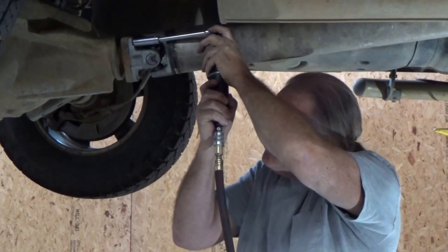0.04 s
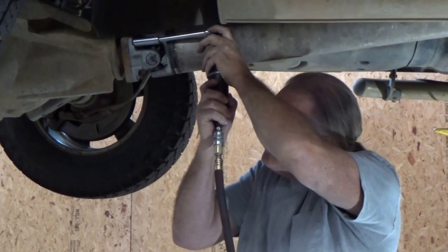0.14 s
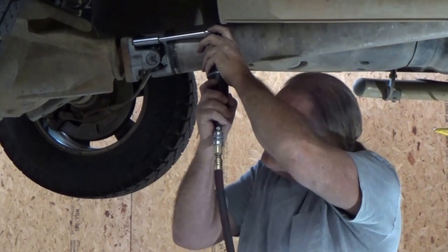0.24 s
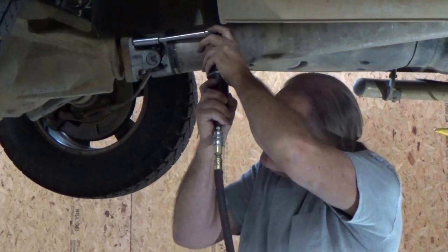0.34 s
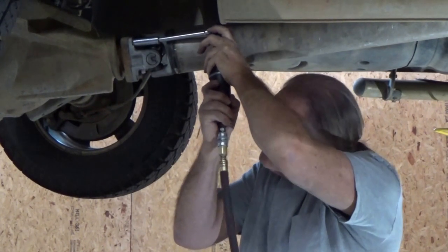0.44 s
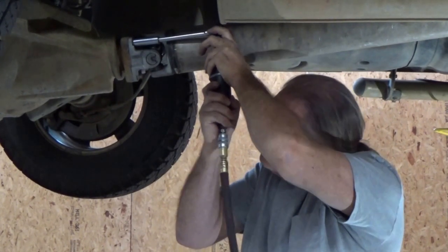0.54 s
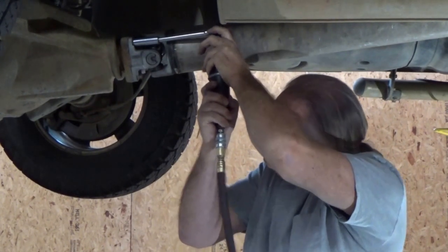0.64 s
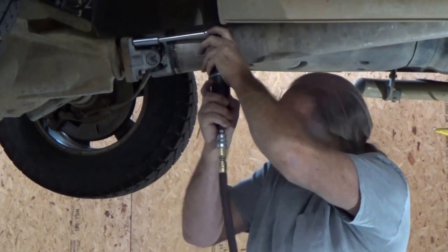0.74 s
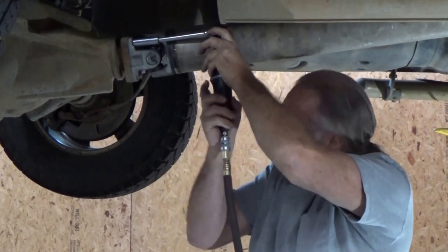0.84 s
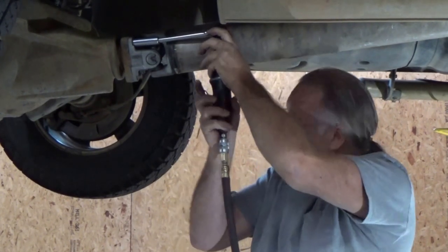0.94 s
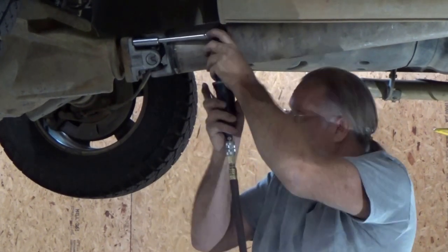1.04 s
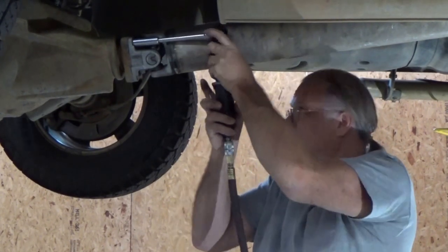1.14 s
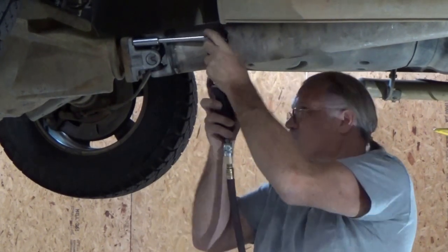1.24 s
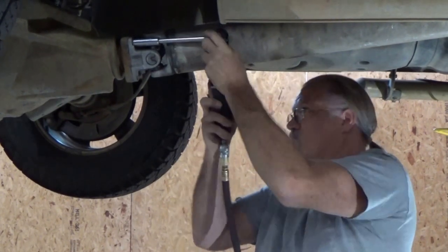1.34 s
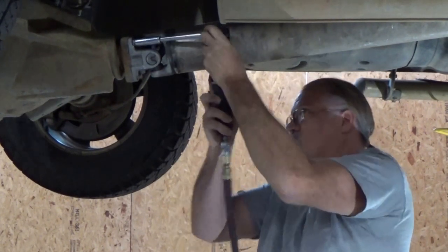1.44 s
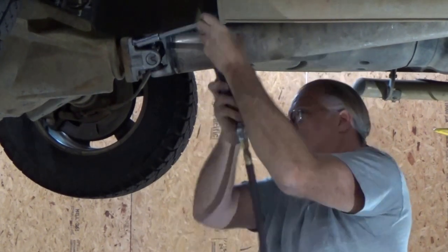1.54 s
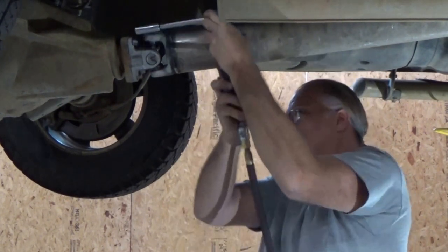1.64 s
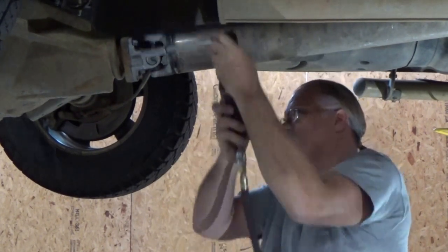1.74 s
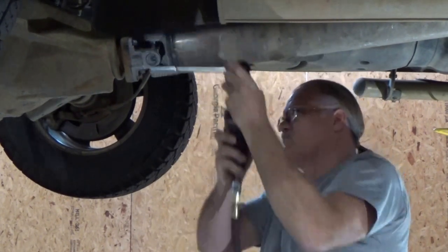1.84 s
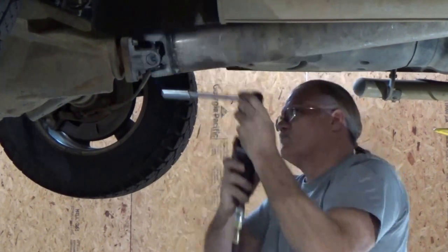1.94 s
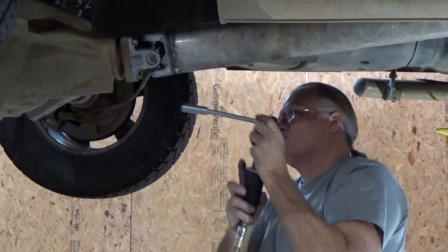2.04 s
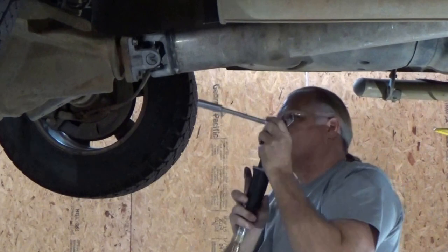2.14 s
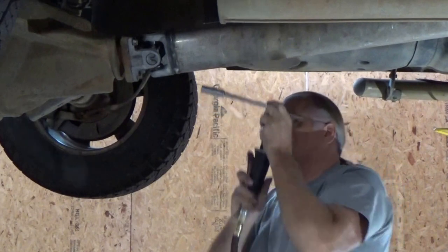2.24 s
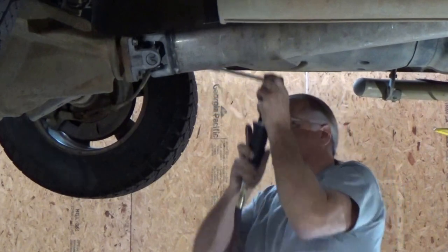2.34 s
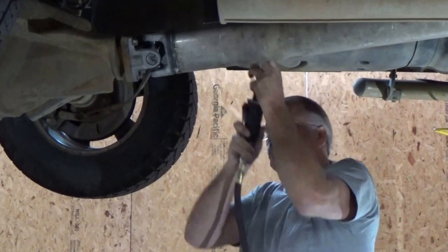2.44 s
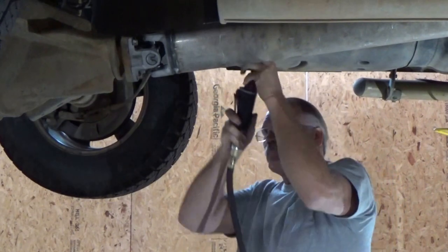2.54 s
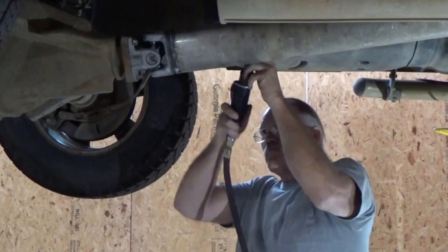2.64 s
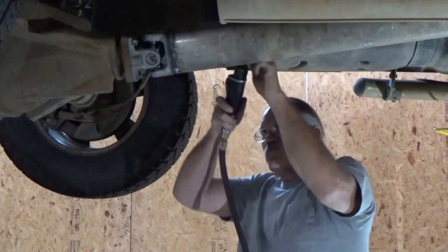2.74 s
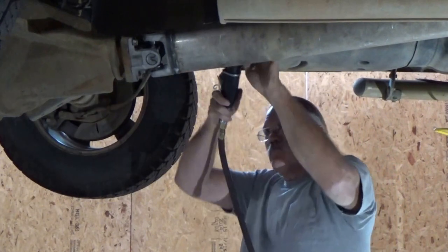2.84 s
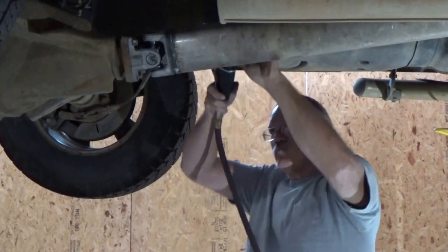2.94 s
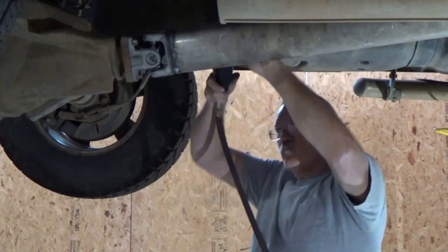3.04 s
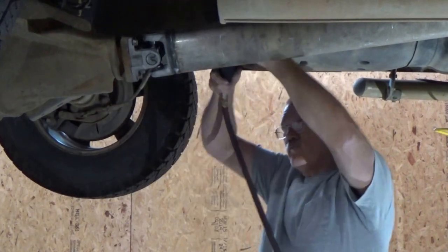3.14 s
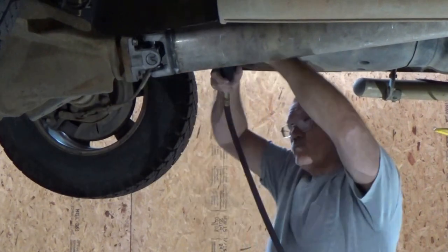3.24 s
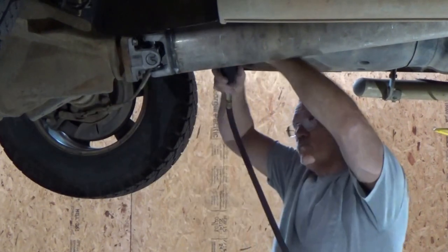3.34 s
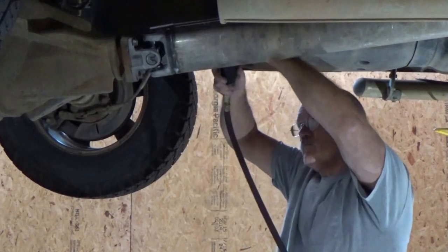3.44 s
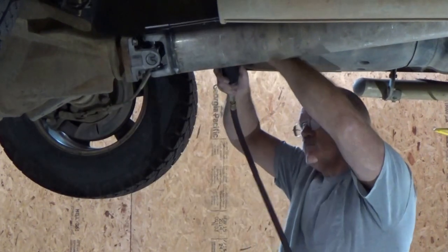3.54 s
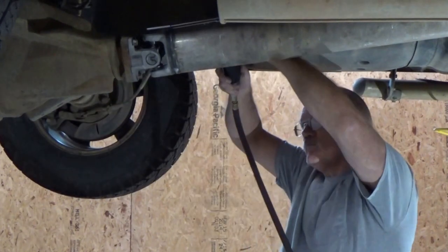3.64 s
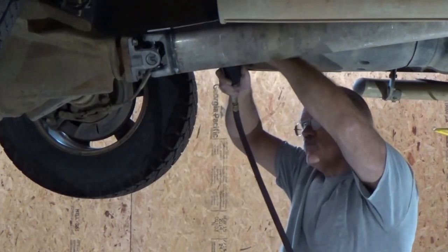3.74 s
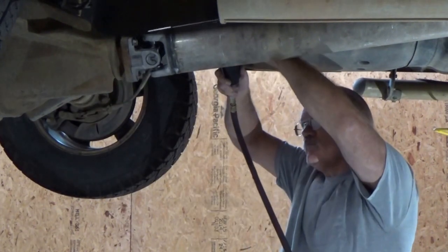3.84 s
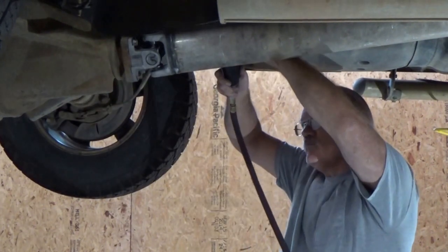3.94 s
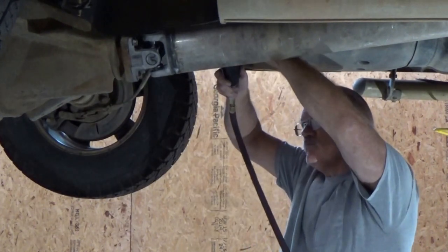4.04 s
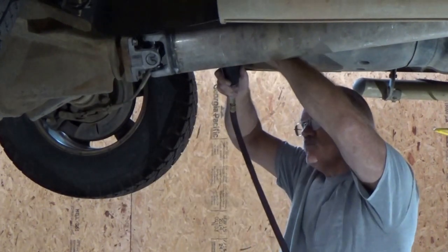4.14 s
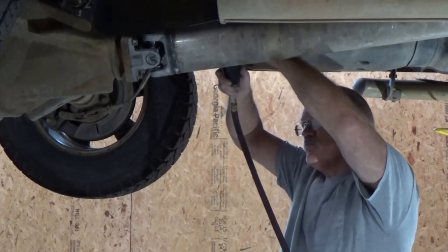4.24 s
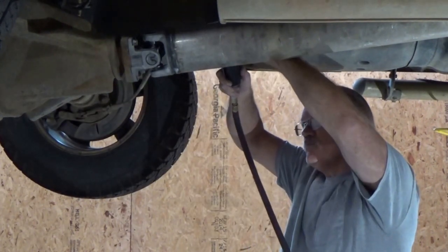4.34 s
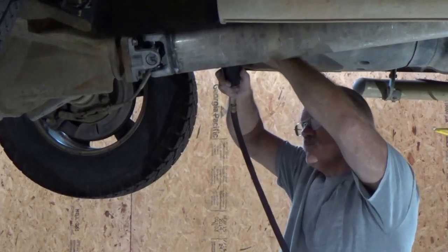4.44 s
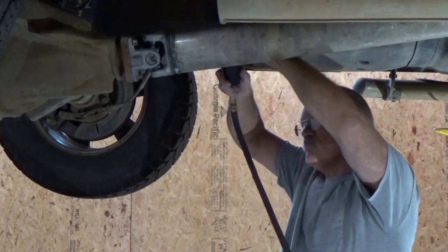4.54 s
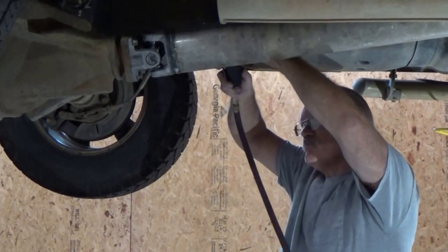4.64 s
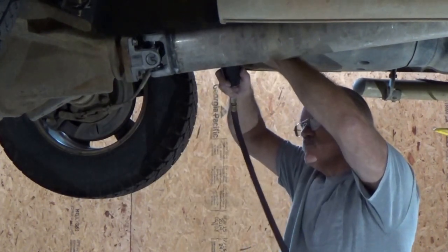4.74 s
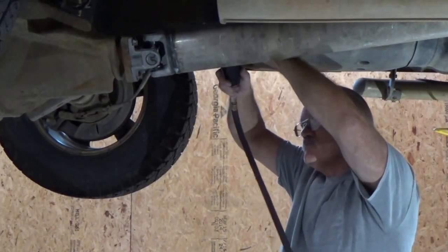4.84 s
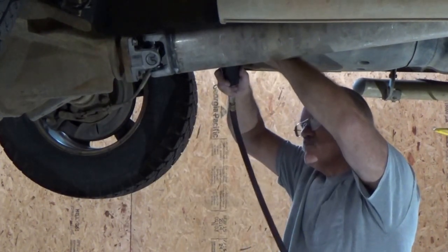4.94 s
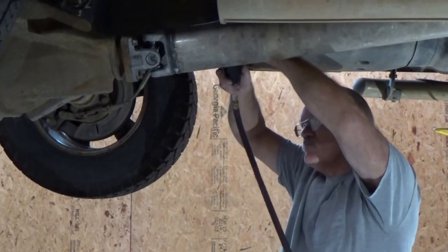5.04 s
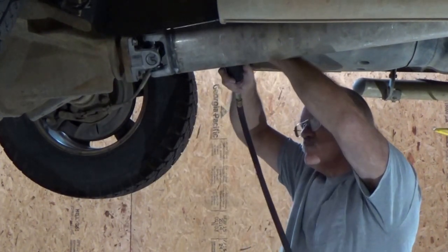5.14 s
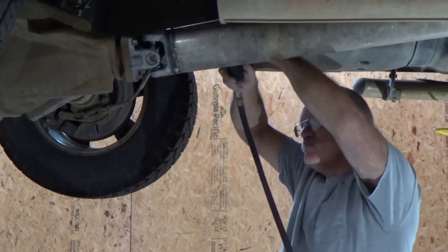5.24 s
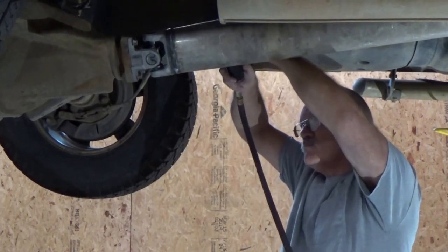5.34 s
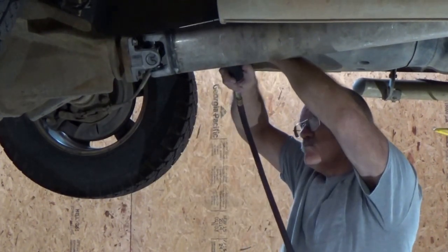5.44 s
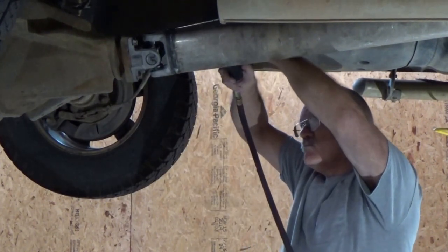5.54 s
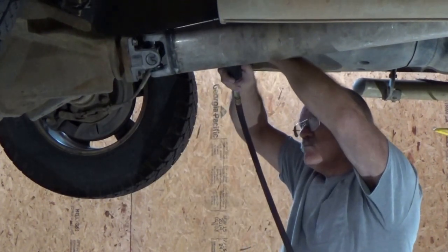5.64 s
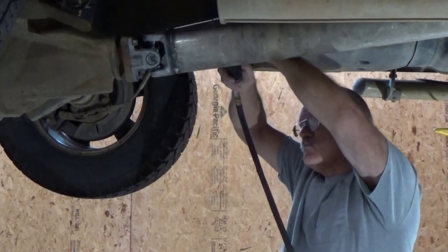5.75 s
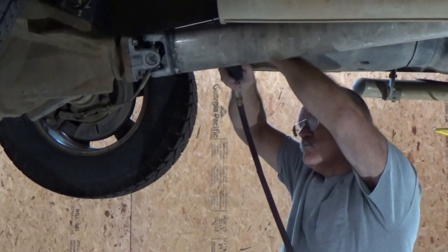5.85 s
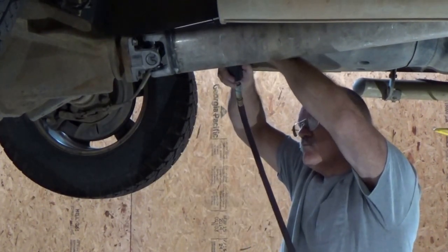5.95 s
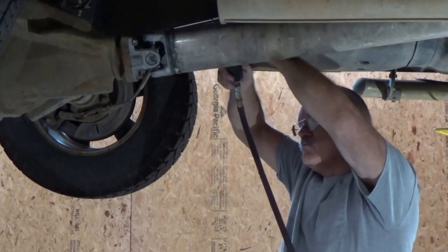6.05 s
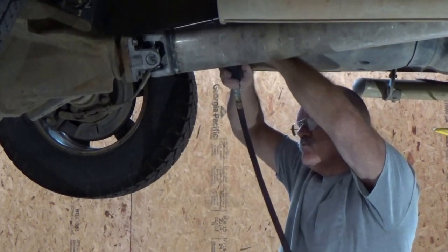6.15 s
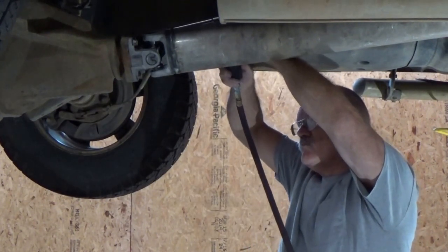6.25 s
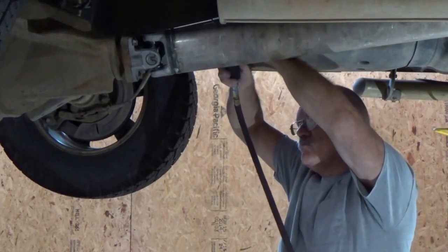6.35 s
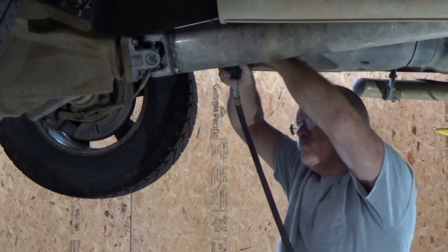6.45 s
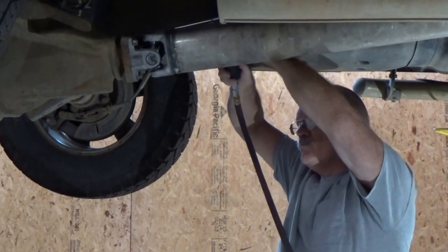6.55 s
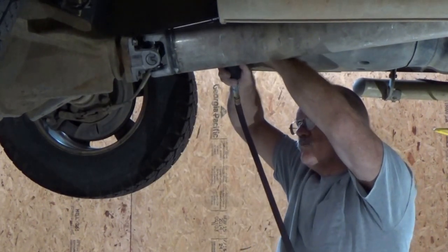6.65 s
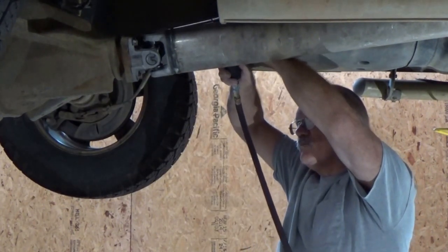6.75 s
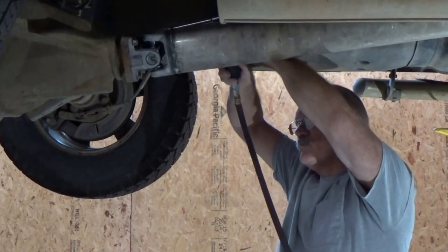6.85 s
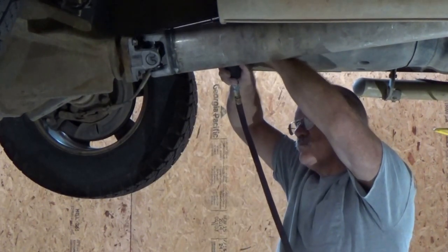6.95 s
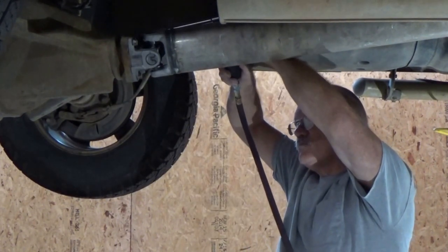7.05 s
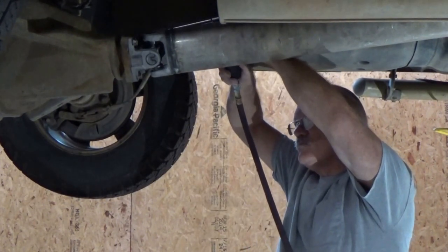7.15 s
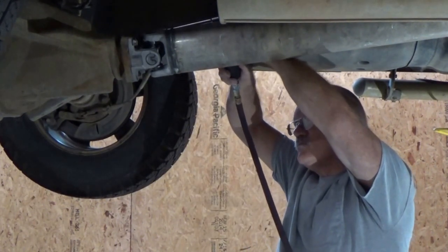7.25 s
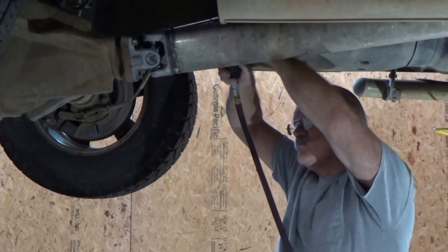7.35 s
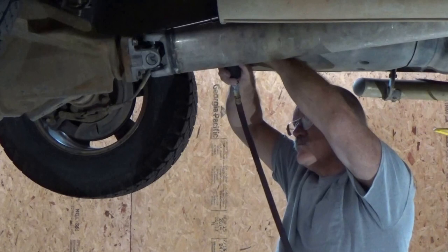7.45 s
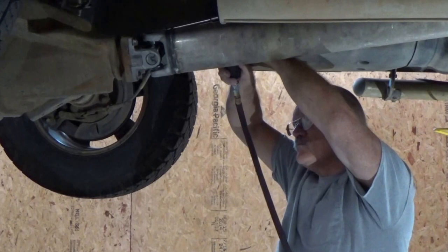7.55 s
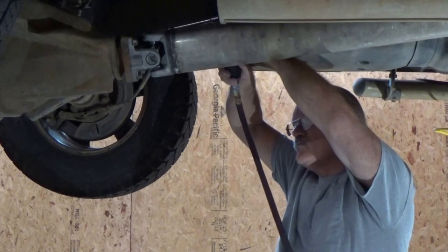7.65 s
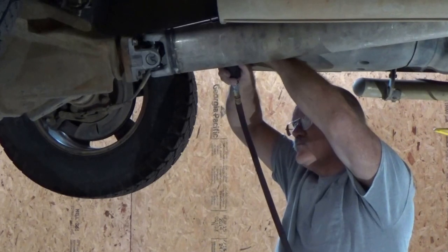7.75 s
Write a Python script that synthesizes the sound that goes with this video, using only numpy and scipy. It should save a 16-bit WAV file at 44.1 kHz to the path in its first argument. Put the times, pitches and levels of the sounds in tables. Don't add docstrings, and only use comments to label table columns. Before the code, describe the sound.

A short end of an air ratchet run: hiss and whine, the motor sagging to a stall, air cut off. Then a quieter gap of handling, with a bright pawl ping, two hard clanks of socket and extension bar, dull bumps and scrapes, and a soft hose leak. The trigger is pulled and a long, strong whirring hiss fills the rest. Close, nearly mono microphones, diffuse shop echo.

```python
import sys
import numpy as np
from scipy import signal
from scipy.fft import rfft, irfft
from scipy.io import wavfile

SR = 44100
rng = np.random.default_rng(int(sys.argv[2]) if len(sys.argv) > 2 else 0)


def to_linear_factor(level_db):
    exponent = np.asarray(level_db, float) / 20
    return 10 ** exponent


def store_pcm(level_fs):
    pcm = np.round(np.clip(level_fs, -1, 1) * 32767).astype(np.int16)
    wavfile.write(sys.argv[1], SR, np.atleast_2d(pcm).T)


N = 344421
TIME = np.arange(N) / SR


def at_hz(points, hz):
    table_hz, values = np.transpose(points)
    return np.interp(np.log(hz + 1), np.log(table_hz), values)


def in_time(rows):
    s, *columns = np.transpose(rows)
    return [np.interp(TIME, s, column) for column in columns]


def rms_one(x):
    return x / np.sqrt(np.mean(x ** 2) + 1e-20)


def coloured(x, spectrum):
    hz = np.fft.rfftfreq(x.shape[-1], 1 / SR)
    return irfft(rfft(x) * to_linear_factor(at_hz(spectrum, hz)), x.shape[-1])


def band(x, low_hz, high_hz, order=3):
    edges_hz = [low_hz, min(high_hz, .47 * SR)]
    return signal.sosfilt(signal.butter(order, edges_hz, "band", fs=SR, output="sos"), x)


def resonance(x, hz, width_hz):
    r = np.exp(-np.pi * width_hz / SR)
    zeros = np.array([1, 0, -1]) * (1 - r * r) / 2
    return signal.lfilter(zeros, [1, -2 * r * np.cos(2 * np.pi * hz / SR), r * r], x)


def drift(rate):
    knots = rng.standard_normal(4000)
    return np.interp(TIME * rate, np.arange(4000), knots) * 1.22


def lone_partials(table):
    out = np.zeros(N)
    for s, hz, db, t60, rise in table:
        after = np.clip(TIME - s, 0, 3)
        level = to_linear_factor(db - 60 * after / t60 + 0.83 * drift(77))
        out += level * (1 - np.exp(-after / rise)) * np.sin(2 * np.pi * hz * after)
    return out


SHUT_S, OPEN_S = 0.84, 5.38
VALVE_OPEN_S, VALVE_SHUT_S = 0.0038, 0.01


def valve():
    closing = np.exp(-np.clip(TIME - SHUT_S, 0, 5) / VALVE_SHUT_S)
    opening = np.exp(np.clip(TIME - OPEN_S, -5, 0) / VALVE_OPEN_S)
    return closing + opening


# t/s, speed f/Hz, whine level/dB
ROTOR_STALL = [
    (0, 284, -43),
    (.25, 283, -43),
    (.4, 276, -45),
    (.47, 225, -50),
    (.52, 165, -54),
    (.56, 95, -60),
    (.83, 60, -70),
]
SPIN_FROM_S, SPIN_UP_S = 5.366, .082
FREE_HZ, OVERSHOOT_HZ, SETTLE_S, WANDER_HZ = 284.5, 9.2, .22, .25
WHINE_DB, WHINE_SPIN_DB, WHINE_FULL_S, WHINE_RISE_DB_PER_S = -32.5, 2.5, 5.402, 1102


def rotor():
    speed, whine_db = in_time(ROTOR_STALL)
    spin = np.clip((TIME - SPIN_FROM_S) / SPIN_UP_S, 0, 1)
    excess = OVERSHOOT_HZ * np.exp(-np.clip(TIME - SPIN_FROM_S - SPIN_UP_S, 0, 5) / SETTLE_S)
    free = (FREE_HZ + excess + WANDER_HZ * drift(4)) * np.sin(np.pi / 2 * spin)
    rise_db = WHINE_RISE_DB_PER_S * np.clip(TIME - WHINE_FULL_S, -.1, 0)
    free_db = WHINE_DB + WHINE_SPIN_DB * (spin < 1) + rise_db
    speed = np.where(spin > 0, free, speed)
    whine_db = np.where(spin > 0, free_db, whine_db)
    hunting = 0.0016 + 0.01668 * (TIME < 5.42)
    angle = 2 * np.pi * np.cumsum(speed * (1 + hunting * drift(90))) / SR
    return speed, whine_db, angle


# multiple of rotor speed, level/dB at free speed, /dB added just off it, /dB added towards standstill
ORDERS = [(4, -22, 36, -2), (7, -23, 0, 0), (8, -20, 6, 0), (10, -12, -20, -40), (12, 0, -8, -55),
          (16, -18, 0, 0), (24, -18, 0, 0)]


def vane_whine(speed, whine_db, angle):
    off_speed = np.sqrt(np.abs(1 - speed / FREE_HZ))
    out = np.zeros(N)
    for k, db, near_db, slow_db in ORDERS:
        order_db = whine_db + 5 + db + near_db * off_speed + slow_db * off_speed ** 2
        out += to_linear_factor(order_db + 1.4 * drift(41)) * np.sin(k * angle + k * k)
    return valve() * out


# f/Hz, level/dB per Hz
EXHAUST_FREE = [(47, -64.5), (80, -27), (149, -25), (323, -30), (441, -14), (643, -15), (2430, -10),
                (3170, -4.5), (3390, -0.5), (3870, -3.5), (5770, -6), (6450, -13.5), (9610, -2),
                (12800, -5.5), (16000, -15)]
# f/Hz, level/dB per Hz
EXHAUST_TURNED = [(47, -70.5), (80, -28), (156, -23.5), (227, -29.5), (515, -14), (2180, -12.5),
                  (3790, -4.5), (4520, -8.5), (5770, -8), (6590, -12), (10500, -0.5), (16000, -15)]
# f/Hz, width f/Hz, level/dB
HOUSING_MODES = [(740, 40, -20), (1500, 370, -12.5), (2530, 150, -8), (5070, 100, -8), (5570, 110, -11),
                 (5770, 140, -5), (6010, 76, -5.5), (6820, 45, -26), (12460, 81, -5)]
# t/s, load 0-1
TOOL_LOAD = [
    (0, 0),
    (.39, 0),
    (.5, .25),
    (.74, 0.62),
    (.79, 0.47),
    (.83, 0.75),
    (5.38, 0.63),
    (5.44, 0.08),
    (5.5, 0.12),
    (7.81, 0.14),
]
# low f/Hz, high f/Hz, level/dB first run, level/dB second run, /dB added at full load
HISS, RASP = (7379, 20499.5, -16.5, -16.0, -3), (1571.5, 7700, -28, -29, 5)
RATTLE, RUMBLE = (347, 1886.5, -41, -37, 7.5), (103.5, 329, -62.5, -56, 23.5)


def exhaust_and_gears(angle):
    first_run = TIME < 3
    chop = 1 + 0.088 * np.cos(4 * angle) + 0.073 * np.cos(angle)
    grit = to_linear_factor(1.2 * drift(1500))
    jet = rng.standard_normal(N) * chop * grit
    turned, free = rms_one(coloured(jet, EXHAUST_TURNED)), rms_one(coloured(jet, EXHAUST_FREE))
    air = np.where(first_run, turned, free)
    air = air + sum(to_linear_factor(db + 4.0) * resonance(air, hz, width_hz) for hz, width_hz, db in HOUSING_MODES)
    load, = in_time(TOOL_LOAD)
    flutters_db = [0.5 * drift(25), 0.89 * drift(30), 1.0 * drift(35), 3.0 * drift(15)]
    out = np.zeros(N)
    for layer, flutter_db in zip((HISS, RASP, RATTLE, RUMBLE), flutters_db):
        low_hz, high_hz, first_db, second_db, load_db = layer
        layer_db = np.where(first_run, first_db, second_db) + load_db * load + flutter_db
        out += to_linear_factor(layer_db) * rms_one(band(air, low_hz, high_hz))
    return to_linear_factor(1.11) * valve() * out


# t/s, f/Hz, peak level/dB, t60 t/s, rise t/s
PAWL_SNAP = [
    (1.2505, 8800, -21, .008, .0002),
    (1.2505, 11800, -26, .006, .0002),
    (1.2575, 8620, -6, .014, .0006),
    (1.2575, 9520, -5.5, .013, .0006),
    (1.2575, 12000, -22, .008, .0004),
]


def pawl():
    return lone_partials(PAWL_SNAP)


# t/s, strength level/dB, weight (thud against it /dB), brightness (tick against it /dB)
CONTACTS = [(0.553, -28.5, -6, 13), (1.448, -46, -15, -13), (1.538, -55.5, -8, -13),
            (1.585, -48, -12, 11.5), (1.642, -38, -20, 7.5), (1.781, -46, -15, 11.5), (2.33, -62, -9, 18),
            (2.358, -60, -15, 18.5), (2.395, -62.5, -1, 19), (2.533, -34, 6, 8), (2.571, -43.5, -5, 4),
            (2.696, -20, -17.5, 3), (2.895, -19, -17.5, 1), (3.04, -39, -3.5, -4), (3.235, -50.5, -3, 2),
            (3.452, -42.5, 9.5, -25), (3.53, -50, -12, -5), (3.566, -31.5, -14, -1),
            (3.658, -29.5, -3, -6.5), (3.808, -43, 1, -1.5), (3.986, -40, -12, -6), (4.08, -31.5, -9, -0.5),
            (4.269, -54, -2.5, -12), (4.652, -43, 8.5, -17), (4.72, -43.5, 1, -6), (4.737, -40, -22, -8),
            (4.769, -44, -2, -12), (4.873, -33.5, -4, -1.5), (5.062, -38, -4.5, 5.5),
            (5.136, -54.5, 11.5, 0)]
# low f/Hz, high f/Hz, t60 t/s, level/dB
PARTS = [
    (153.3, 870, 0.18, 1.5),
    (895, 2400, 0.092, -3),
    (2420, 6000, 0.064, -1.5),
    (8150, 13400, 0.097, -8),
]
BODY_MODES_HZ = [(187, 330, 720), (600, 1240, 1800), (2500, 4070, 5700), (8880, 9100, 11200)]
BODY_MODES_DB = [(-8, -5, 7.5), (3.5, 5, -4), (1, -6.5, -6), (-3, -5, -1)]
# f/Hz, level/dB, t60 t/s
BAR_PARTIALS = [(1841, 3, 2.2), (3800, 5, 0.42), (4840, -34, 0.87), (4770, -6, 0.56), (5900, 1, 0.063),
                (7052, -30, 0.24), (7400, -30, 0.18), (9200, 2, 0.34), (9000, -31, 0.44), (9600, 19, 0.17),
                (10000, 0, 0.18), (10400, 13, 0.22)]
BAR_DROP_TIMES = [2.895, 3.04, 3.236]
DULL_DB, DULL_PER_WEIGHT, DULL_PER_BRIGHT = 2, 0.23, -0.16
BODY_SCATTER, BODY_SPREAD_DB, BODY_DAMP_S = 0.041, 8, 0.033


def knocks():
    s, strength_db, weight_db, bright_db = np.transpose(CONTACTS)
    dull_db = DULL_DB + DULL_PER_WEIGHT * weight_db + DULL_PER_BRIGHT * bright_db
    parts_db = strength_db + np.array([weight_db, dull_db, -dull_db, bright_db])
    at, after, out = (s * SR).astype(int), TIME[:SR // 2], np.zeros(N + SR)
    luck = rng.uniform(-0.97, 1, (len(at), 4, 2, 3))
    for k, (low_hz, high_hz, t60, db) in enumerate(PARTS):
        noise = rms_one(band(rng.standard_normal(N + SR), low_hz, high_hz))
        shape = to_linear_factor(db - 60 * after / t60) * (1 + 0.95 * np.exp(-after / 0.00039))
        shape *= 1 - np.exp(-after * low_hz * 0.36)
        shape *= 1 + 0.55 * np.exp(-(after / 0.014) ** 2)
        for i, part_db, (detune, shift) in zip(at, parts_db[k], luck[:, k]):
            modes_hz = BODY_MODES_HZ[k] * (1 + BODY_SCATTER * detune)
            modes = to_linear_factor(BODY_MODES_DB[k] + BODY_SPREAD_DB * shift / 2)
            body = modes @ np.sin(2 * np.pi * np.outer(modes_hz, after))
            blow = noise[i:i + len(after)] + 0.46 * np.exp(-after / BODY_DAMP_S) * body
            out[i:i + len(after)] += to_linear_factor(part_db) * shape * blow
    bar = np.zeros(len(after))
    for hz, db, t60 in BAR_PARTIALS:
        bar += to_linear_factor(db - 60 * after / min(t60, .18)) * np.sin(2 * np.pi * hz * after)
    for drop in BAR_DROP_TIMES:
        k = np.argmin(abs(s - drop))
        out[at[k]:at[k] + len(after)] += to_linear_factor(strength_db[k] - 26) * bar
    return out[:N]


# t/s, f/Hz, peak level/dB, t60 t/s, rise t/s
STEEL_RINGS = [(.828, 754, -17, 0.064, 0.0089), (.86, 141, -47.5, 2.8, .03),
               (0.899, 321.5, -54, 1.2, 0.024), (1.252, 1185, -42, 0.035, 0.0037),
               (1.407, 13400, -52, 0.033, .001), (1.644, 394, -49, 0.84, .005),
               (1.86, 496, -51.5, 0.083, 0.0032), (2.162, 2430, -50, 0.21, 0.0072),
               (2.398, 10100, -43, 0.063, .001), (2.536, 1717, -32.5, 0.13, 0.0032),
               (2.698, 2240, -36, 0.054, .002), (2.696, 4075, -39, 0.17, .002),
               (2.915, 1166, -38, 0.088, .005), (3.237, 1145, -43, 0.13, 0.0037),
               (3.459, 1036, -34, 0.21, 0.0071), (3.665, 1020, -27.5, 0.14, 0.0067),
               (3.669, 186, -33.5, 0.35, 0.012), (4.656, 1820, -35, .06, 0.0017),
               (3.812, 704, -34, .08, .004), (4.875, 520, -56, .08, .004)]


def steel_rings():
    return lone_partials(STEEL_RINGS)


# t/s, f/Hz,
# width f/Hz, level/dB, t60 t/s
RUB_STROKES = [(.55, 700, 470, -33, 0.64), (.84, 151, 59, -44.5, 0.95), (1.252, 1500, 800, -48.5, .05),
               (0.827, 666, 400, -26.5, 0.26), (1.25, 4020, 3020, -34.5, 0.043),
               (1.64, 250.2, 74, -48, 0.3), (2.13, 3920, 3500, -50, 0.48), (2.155, 400, 500, -54, 0.18),
               (2.158, 2500, 450, -42, 0.26), (2.532, 715, 298, -30, 0.15), (3.452, 2300, 600, -41, 0.12),
               (3.66, 2330, 450, -32.5, 0.21), (4.655, 185, 59.6, -42, 0.6), (4.655, 1390, 1200, -41, 0.16),
               (4.88, 2350, 600, -45, .4), (5.376, 550, 800, -31, 0.18)]
RUB_RISE_SHARE = 0.018


def rubs():
    grain, out = rng.standard_normal(N) * to_linear_factor(3.5 * drift(310)), np.zeros(N)
    for s, hz, width_hz, db, t60 in RUB_STROKES:
        after = np.clip(TIME - s, 0, 3)
        tone = rms_one(resonance(resonance(grain, hz, width_hz), hz, width_hz))
        swell = (1 - np.exp(-after / (RUB_RISE_SHARE * t60))) ** 2
        out += to_linear_factor(db - 60 * after / t60) * swell * tone
    return out


# f/Hz, t60 t/s
SHOP_DECAY = [(100, 1), (500, 0.49), (2000, 0.76), (6000, 0.78), (15000, 0.11)]
ECHO_DB, ECHO_SIDE_DB, DIRECT_SIDE_DB = -8.5, 3, -13.5


def workshop(x):
    after, tail = TIME[:SR], np.zeros((2, SR))
    for hz in 58.0 * 2 ** np.arange(8):
        octave = band(rng.standard_normal((2, SR)), hz, 2 * hz + 1, order=2)
        tail += octave * to_linear_factor(-60 * after / at_hz(SHOP_DECAY, 1.35 * hz))
    tail *= 1 - np.exp(-after / 0.0009)
    tail = to_linear_factor([[ECHO_DB], [ECHO_DB + ECHO_SIDE_DB]]) * tail / np.sqrt(np.sum(tail[0] ** 2))
    tail[:, 0] = 1, to_linear_factor(DIRECT_SIDE_DB)
    return signal.fftconvolve(x[None], tail, axes=1)[:, :N]


# f/Hz, level/dB per Hz
QUIET_SHOP = [(15, -33.5), (25, -34), (64, 1), (175, -1.5), (394, -12), (476, 0), (591, -9), (796, -10.5),
              (1020, -10.5), (2480, -14.5), (4740, -18), (6740, -25.5), (11000, -11.5), (14800, -21.5),
              (16000, -28.5)]
# t/s, rumble level/dB
BODY_STIR = [(1.25, -55), (1.4, -60.5), (1.7, -61.5), (1.9, -62.5), (2.45, -62), (2.75, -57), (3.25, -59.5),
             (3.75, -49.5), (4.11, -55), (4.5, -55), (5.02, -53.5), (5.3, -54)]
# t/s, level/dB
HOSE_LEAK = [(1.3, -67), (1.8, -68.5), (2.14, -62), (2.38, -65), (3.25, -61), (4.1, -58.5), (4.7, -55.5),
             (5.0, -49), (5.2, -55.5)]
SHUFFLE_DB, SHUFFLE_PER_STIR, SHUFFLE_PER_LEAK = -59.5, 0.27, 0.76


def background():
    noise = coloured(rng.standard_normal((2, N)), QUIET_SHOP)
    (rumble_db,), (leak_db,) = in_time(BODY_STIR), in_time(HOSE_LEAK)
    shuffle_db = SHUFFLE_DB + SHUFFLE_PER_STIR * (rumble_db - rumble_db.mean())
    shuffle_db += SHUFFLE_PER_LEAK * (leak_db - leak_db.mean())
    out = to_linear_factor(rumble_db + 2.0 * drift(5.9)) * band(noise, 36, 380) / np.std(band(noise[0], 30, 350))
    out += to_linear_factor(shuffle_db + 1.3 * drift(11)) * rms_one(band(noise, 300, 5200))
    out += to_linear_factor(leak_db + 1.0 * drift(7)) * rms_one(band(noise, 6300, 20500))
    return out * to_linear_factor(-12 * valve())


# f/Hz, side against mid level/dB
PAIR_SIDE = [(60, -31), (110, -26), (200, -25), (380, -15.5), (700, -9), (1290, -10), (2380, -9.5),
             (4400, -11), (8120, -11), (15000, -21.5)]
WHINE_ECHO_SHARE, PAWL_ECHO_SHARE = .2, .45
KNOCK_PAN_DB = -2


def scene():
    speed, whine_db, angle = rotor()
    whine, air, snap = vane_whine(speed, whine_db, angle), exhaust_and_gears(angle), pawl()
    handling = knocks() + steel_rings() + rubs()
    into_shop = air + WHINE_ECHO_SHARE * whine + PAWL_ECHO_SHARE * snap + handling
    mid, side = workshop(into_shop) + background()
    mid += (1 - WHINE_ECHO_SHARE) * whine + (1 - PAWL_ECHO_SHARE) * snap
    side = -coloured(side, PAIR_SIDE)
    side += band(handling, 300, 9200, order=1) * (to_linear_factor(KNOCK_PAN_DB) - 1) / 2
    return np.array([mid + side, mid - side])


def roll_off(x):
    return signal.sosfilt(signal.butter(12, 16930, fs=SR, output="sos"), x)


def record(dry):
    top_cut = signal.ellip(14, .5, 70, 15730, fs=SR, output="sos")
    rounded = 0.69 * np.tanh(dry / 0.72)
    return roll_off(signal.sosfilt(top_cut, rounded))


dry = scene()
out = record(dry)
store_pcm(out)
```